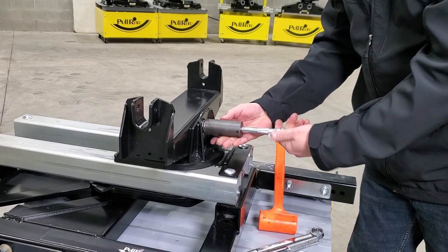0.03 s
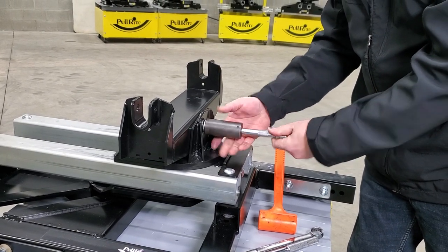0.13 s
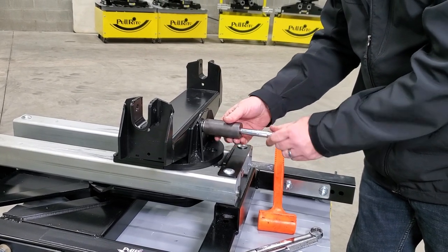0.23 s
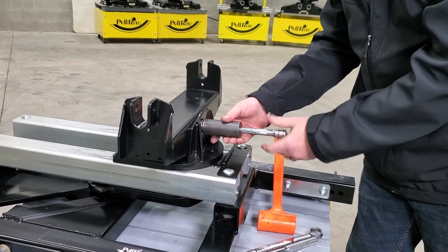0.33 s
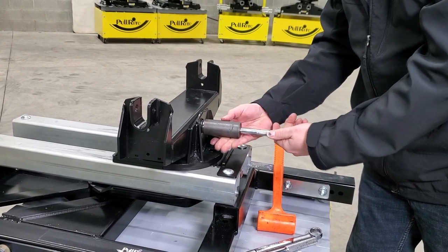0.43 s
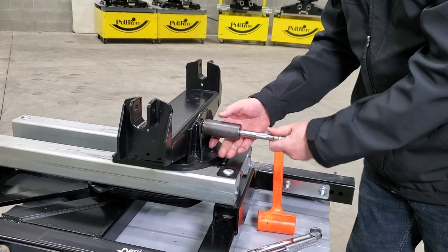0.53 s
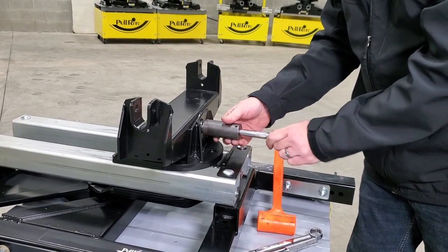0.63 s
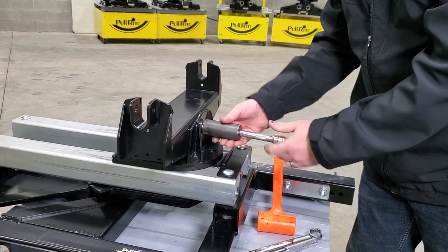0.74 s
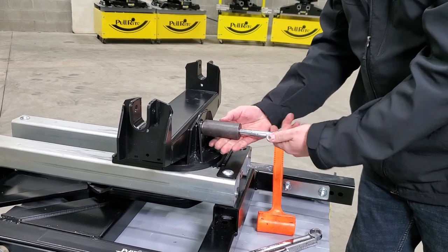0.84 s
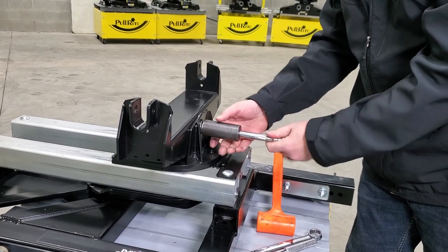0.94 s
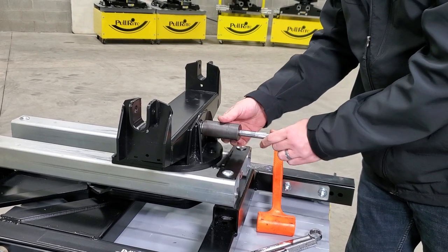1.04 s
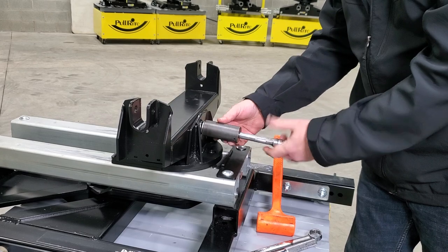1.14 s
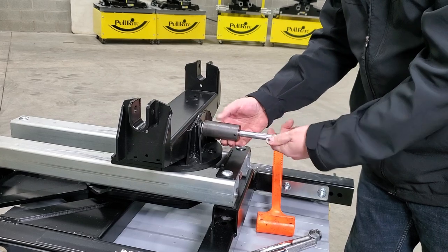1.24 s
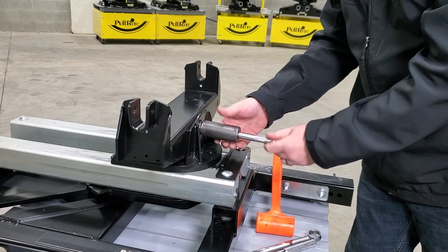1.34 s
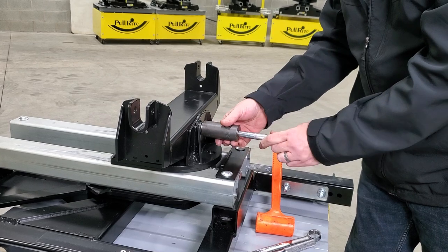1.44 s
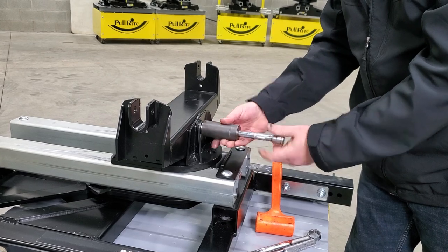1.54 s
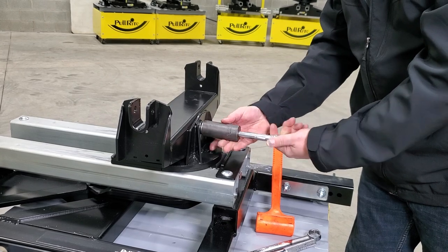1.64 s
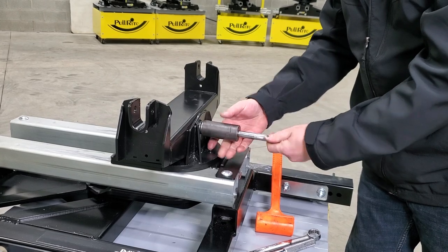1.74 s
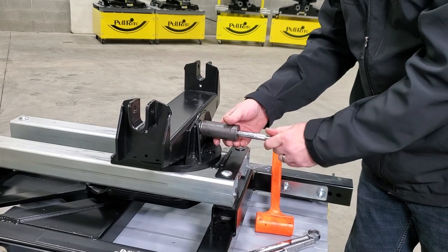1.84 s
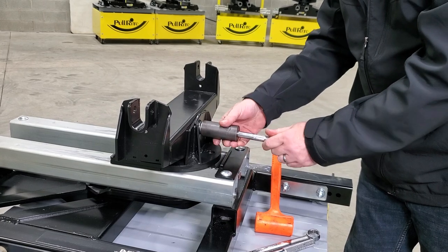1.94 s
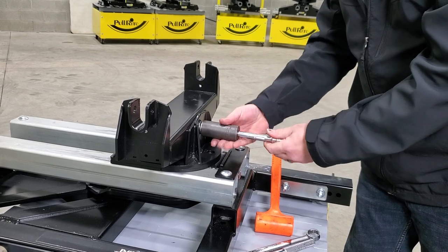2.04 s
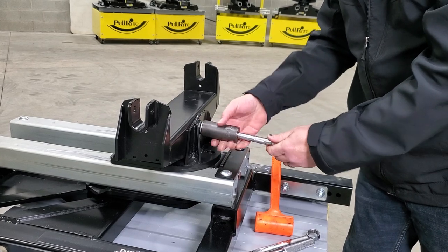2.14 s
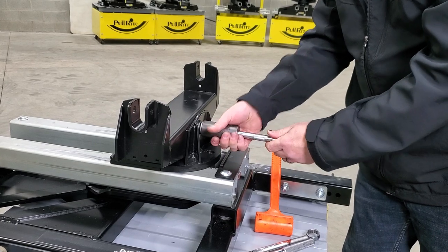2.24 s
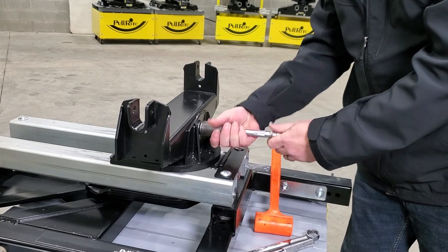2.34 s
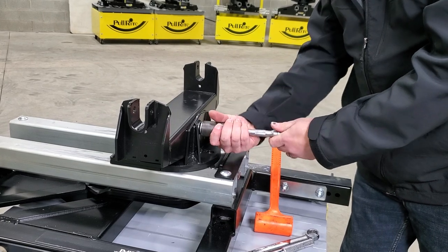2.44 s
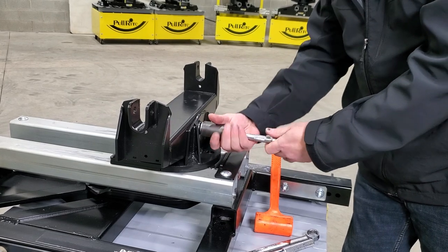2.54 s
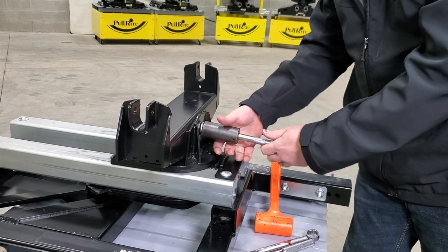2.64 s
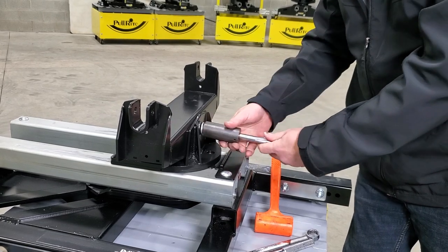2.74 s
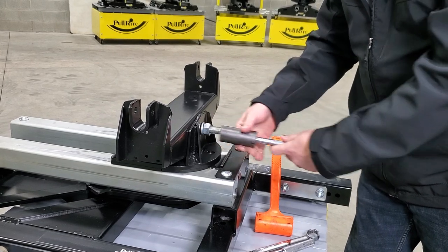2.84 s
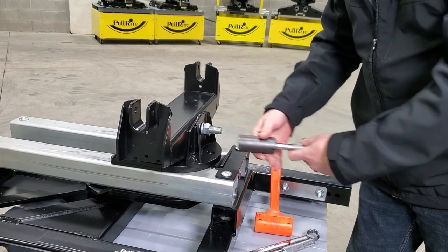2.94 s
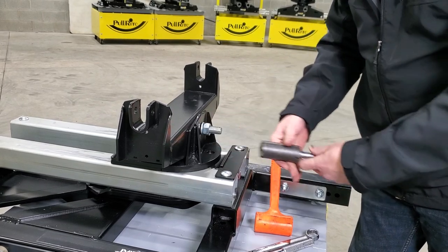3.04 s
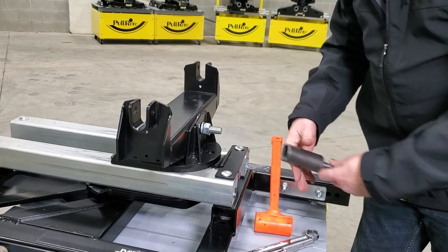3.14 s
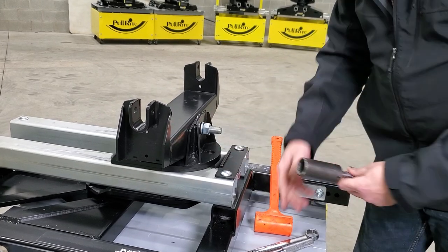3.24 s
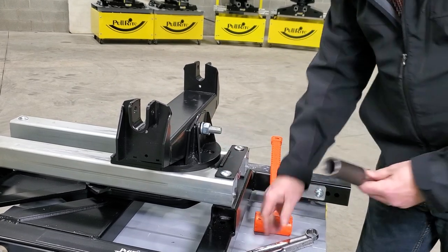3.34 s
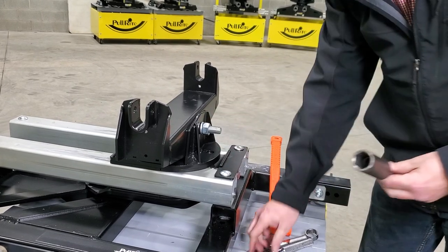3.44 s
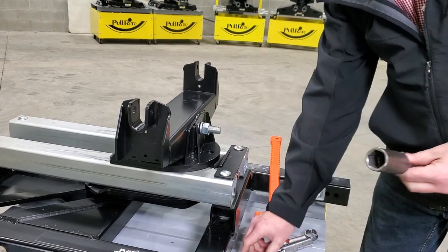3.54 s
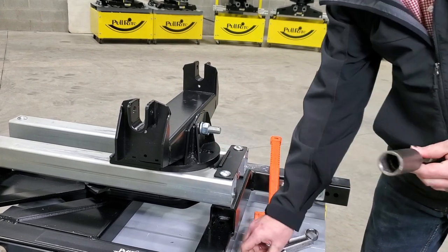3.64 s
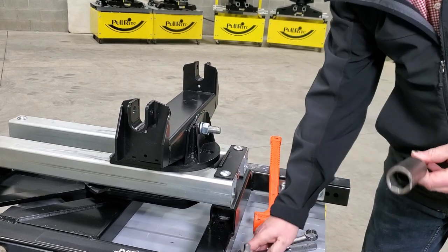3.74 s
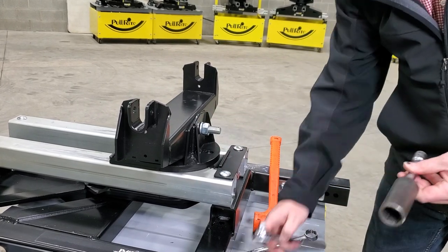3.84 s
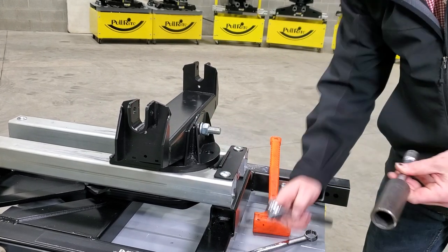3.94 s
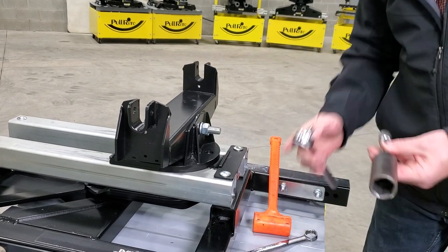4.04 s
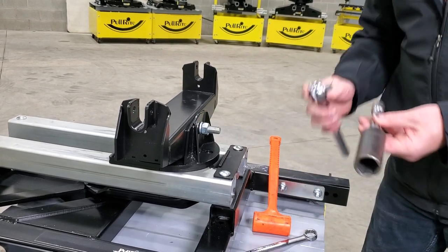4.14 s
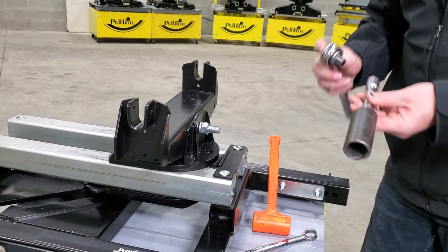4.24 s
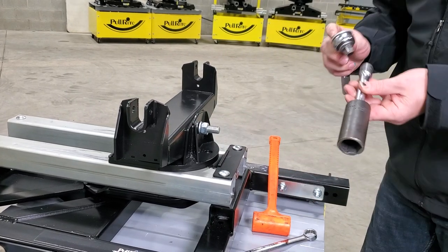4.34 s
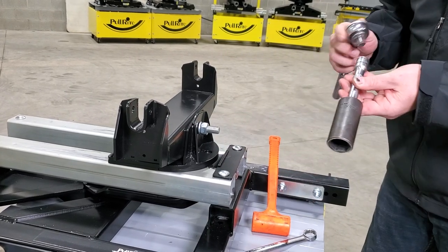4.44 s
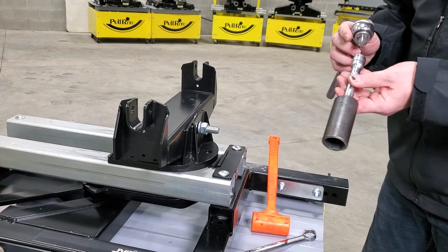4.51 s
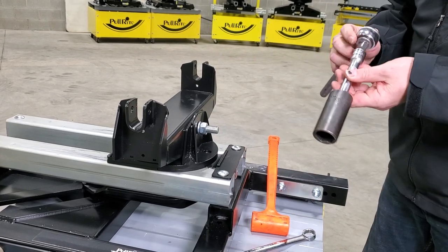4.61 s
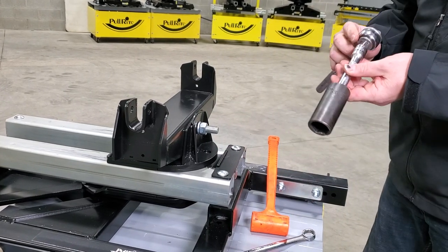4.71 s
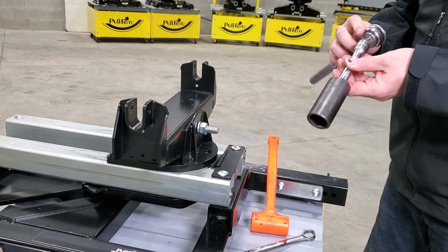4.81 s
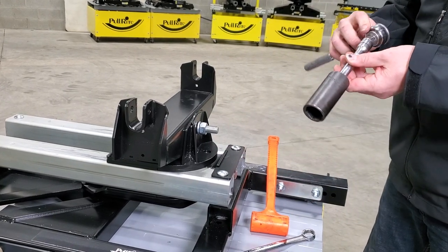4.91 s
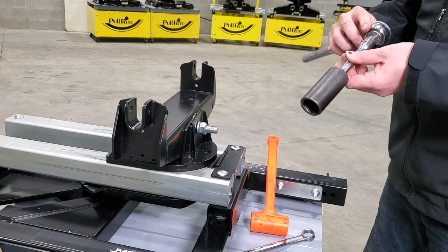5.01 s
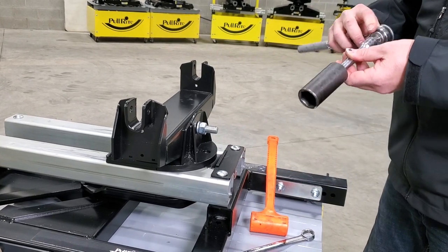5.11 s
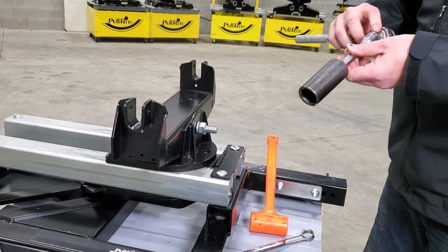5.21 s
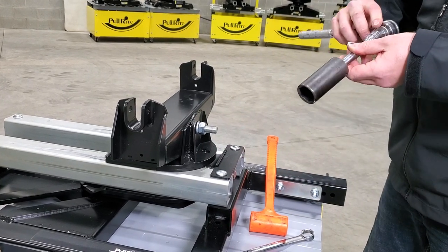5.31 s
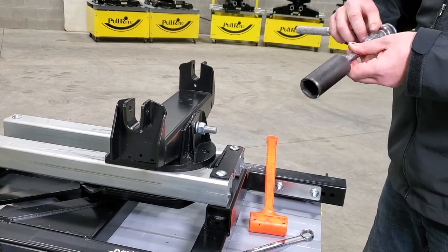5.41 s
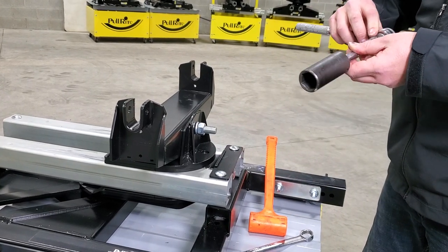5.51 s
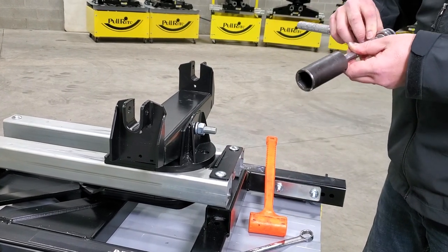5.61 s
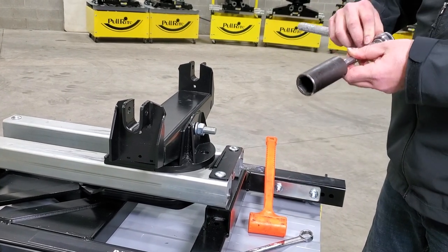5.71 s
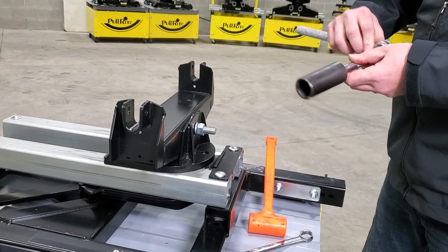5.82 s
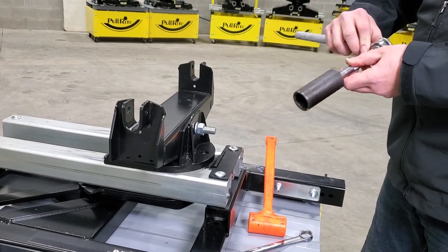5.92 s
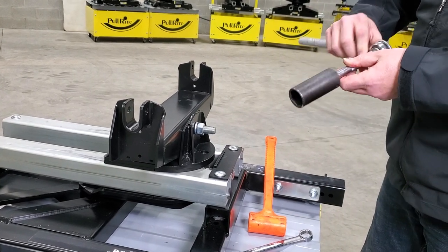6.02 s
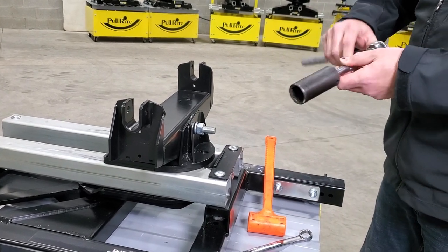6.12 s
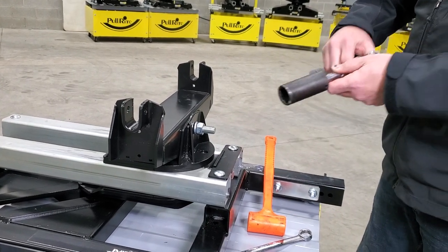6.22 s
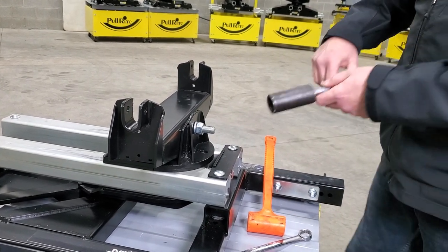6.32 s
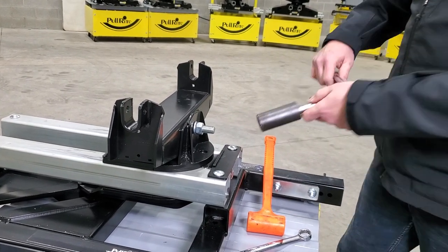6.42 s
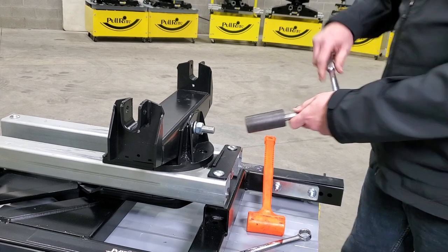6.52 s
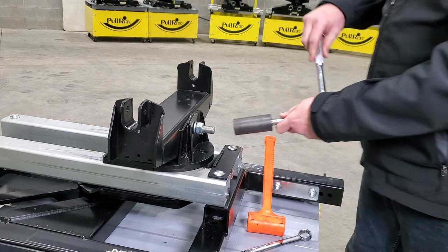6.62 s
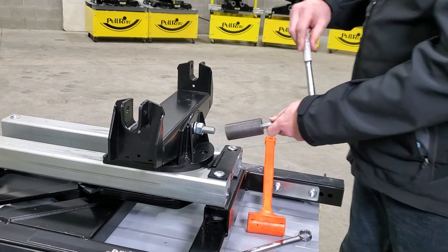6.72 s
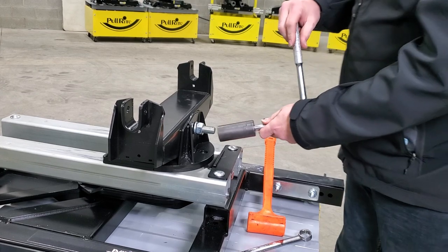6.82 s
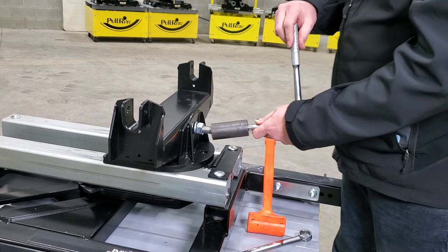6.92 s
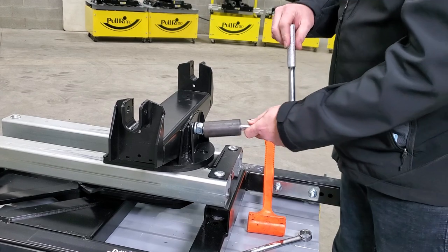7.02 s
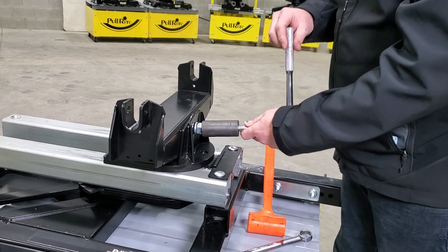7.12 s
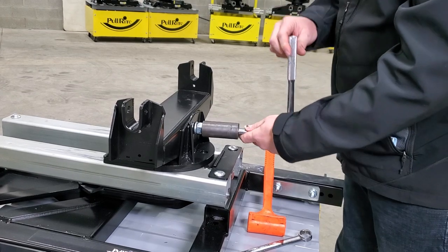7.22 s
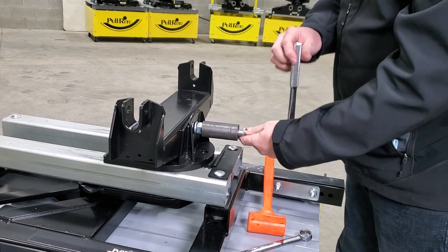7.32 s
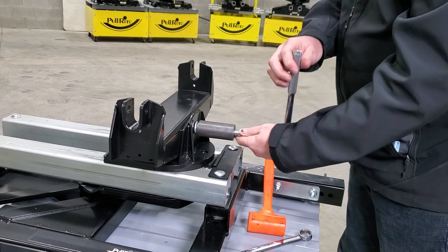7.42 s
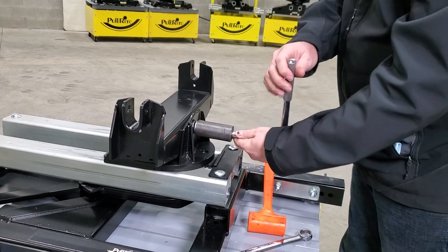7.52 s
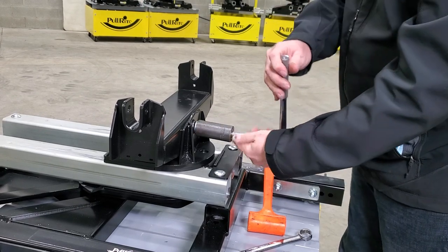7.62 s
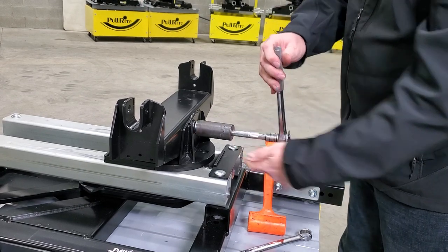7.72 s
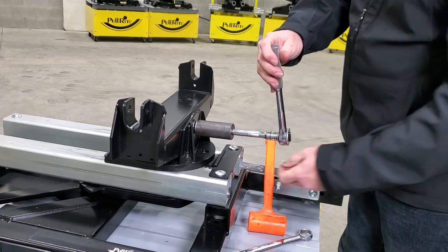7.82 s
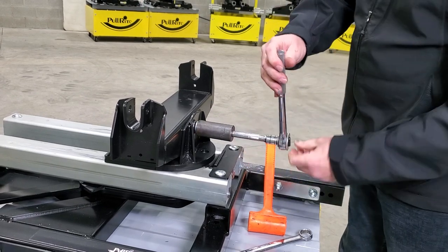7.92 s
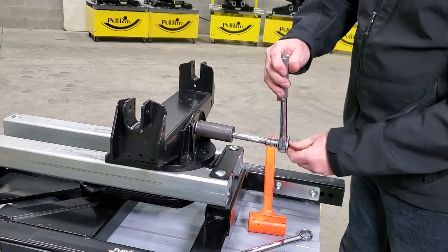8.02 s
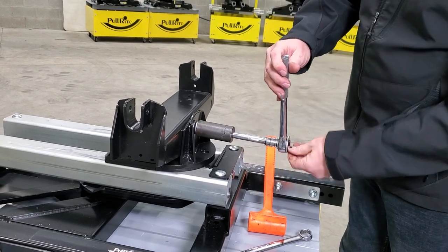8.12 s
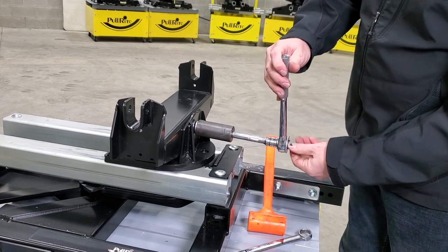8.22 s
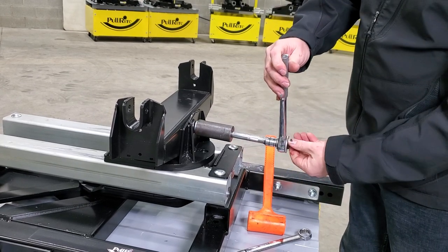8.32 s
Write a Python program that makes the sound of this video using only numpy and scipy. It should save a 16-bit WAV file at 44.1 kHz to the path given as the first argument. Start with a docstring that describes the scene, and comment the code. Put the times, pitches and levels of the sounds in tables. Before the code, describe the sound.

A socket turns a nut down a bolt by hand, making faint gritty scrapes and small clicks against a steel frame. It clanks as it comes off. A ratchet clatters loudly on a steel plate, then snaps onto the extension with light clicks. The socket knocks back over the nut with ringing clanks. The sounds are close, with a short workshop echo, soft jacket rustle and a low rumble.

```python
"""In a large workshop, a nut is run down a bolt on a steel hitch frame by hand, with a deep socket.
The thread grinds in tiny slips and the socket knocks, ringing the frame, then is pulled off.
A ratchet clatters on a steel plate as it is picked up and clicks onto the extension, and the socket
is pushed back over the nut. The steel echoes in the hall; a jacket rustles over its low rumble."""
import sys
import numpy as np
from scipy import signal
from scipy.fft import rfft, irfft, next_fast_len
from scipy.io import wavfile

SR = 44100
rng = np.random.default_rng(int(sys.argv[2]) if len(sys.argv) > 2 else 0)


def persist_wave(psi):
    """Save psi, clipped to +-1, as 16-bit WAV."""
    counts = np.round(np.clip(psi, -1, 1) * 32767).astype(np.int16)
    wavfile.write(sys.argv[1], SR, np.atleast_2d(counts).T)


N = 368672
TIME = np.arange(N) / SR

# Steel knocks on steel, mostly the socket on the nut.
# Each row: start in seconds, level in dB, brightness in dB, contact pitch in Hz.
KNOCKS = [(0.105, -37, 5, 2390), (0.121, -25.5, -17, 2320), (0.483, -33, -11.5, 2210),
          (0.537, -31, -19.5, 2450), (0.635, -31, -31, 1110), (0.823, -31.5, -21.5, 1140),
          (0.887, -33, -21, 1550), (1.141, -28, -22.5, 1550), (1.262, -26.5, -21, 1520),
          (1.33, -31.5, -15, 1580), (1.553, -32, -42, 1500), (1.591, -29.5, -29, 1820),
          (2.148, -31.5, -30, 1130), (2.451, -33, -29, 1240), (2.533, -26, -36, 2000),
          (2.748, -10.5, -20, 2030), (2.765, -20, -28, 1196), (3.369, -41.5, -31.5, 1140),
          (6.463, -43.5, -32, 1874), (6.878, -24.5, -31, 1330), (6.924, -13.5, -25.5, 1890),
          (6.944, -21.5, -6, 1950), (6.997, -11.5, -14, 1540), (7.012, -14, -38, 1530),
          (7.401, -18.5, -18.5, 1570)]
# The ratchet's bounces on the plate. Each row: start in seconds, level in dB.
CLATTER = [(3.63, -5.5), (3.643, -6), (3.666, -12.5), (3.685, -11)]
# Snaps of play in the tool, pawl and detent ball.
# Each row: start in seconds, level in dB, brightness in dB, pitch in Hz.
CLICKS = [(0.1007, -24, -13.5, 2110), (0.395, -23, -34, 3740), (0.6658, -17.5, -24.5, 3510),
          (0.7883, -30.5, -22, 4900), (1.261, -31, -17.5, 2010), (1.55, -51.5, -4.5, 2420),
          (2.3061, -32, -42.5, 3180), (2.335, -30, -44, 2200), (2.55, -30.5, -26.5, 2040),
          (4.023, -40.5, -14, 5580), (4.599, -24, -25.5, 3300), (4.6222, -27.5, -22, 3200),
          (4.9344, -31.5, -21.5, 3564), (5.1866, -37.5, -35, 3220), (5.231, -31, -23.5, 2440),
          (5.4974, -58.5, -1.5, 3290), (5.741, -12.5, -18, 6470), (5.7628, -21, -20, 6020),
          (6.0438, -37, -22, 3240)]
# The frame's ringing modes. Each row: pitch in Hz, level in dB, ring time (t60) in seconds.
FRAME_MODES = [(328, -12, 0.14), (635, -4.5, 0.2), (765, -4.5, 0.36), (1052, 3, 0.18), (1253, -12.5, 0.36),
               (1250, -17.5, 0.37), (1536, -5, 0.37), (1760, -19, 0.74), (2064, 3.5, 0.18),
               (2090, -14, 0.38), (2660, -7.5, 0.11), (2310, -14, 0.24), (2570, -8.5, 0.24),
               (2730, -16.5, 0.48), (2780, -7.5, 0.25)]
# The tone of rubbed steel. Each row: frequency in Hz, level in dB.
RUB_COLOUR = [(150, -23.5), (350, -6), (600, -0.5), (1000, -2.5), (2400, -7), (3300, -15.5), (5000, -25.5),
              (8000, -32.5), (16000, -40)]
# The frame sits to the left. Each row: frequency in Hz, left over right in dB.
FRAME_SIDE = [(60, -1.5), (110, 5.5), (200, -0.5), (380, -0.5), (700, 2.5), (1290, 6.5), (2380, 9),
              (4400, 2), (8120, 0.5), (15000, 3.5)]
# Narrow bass, wide treble. Each row: frequency in Hz, left-right likeness from 0 to 1.
LIKENESS = [(60, .985), (200, .97), (400, .84), (700, .6), (1400, .25), (3000, .05), (15000, 0)]


def frame_knocks():
    """Steel knocks on steel, mostly the socket on the nut, and the whole frame answers."""
    # The clank's tone. Each row: frequency in Hz, level in dB.
    frame_colour = [(180, -48.5), (300, -21), (593, -4), (856, -5.5), (994, 1), (1840, -5), (2030, -4.5),
                    (2700, -3.5), (2930, -9), (4370, -13.5), (5900, -18.5), (8090, -35.5), (10200, -27),
                    (10700, -31.5), (16000, -35)]
    # Shoves of the socket along the bolt thud the frame. Each row: start in seconds, level in dB.
    shoves = [(1.136, -34.5), (7.011, -28.5), (7.428, -27.5)]
    # a seated socket passes the tool's snaps into the frame, softer and duller
    snaps = [(s, db - 13, treble_db - 7, hz) for s, db, treble_db, hz in CLICKS if seated(s)]
    blows = [(s, db, treble_db + 23.5, hz) for s, db, treble_db, hz in KNOCKS + snaps]
    clank = clanks(blows, frame_colour, clank_db=-5.5, beam_db=-17, pitch_db=7.5, crack=0.2,
                   chatter_db=1.0, t60=0.19, beam_t60=0.48, rebound=from_db(-9))
    # the thud grows more slowly with the blow than the clank does
    thud = thuds([(s, -30.5 + 0.47 * db) for s, db, *_ in KNOCKS] + shoves, t60=0.31)
    # the plate is part of the frame, so its bounces ring these modes too
    strikes = [(s, db) for s, db, *_ in blows] + [(s, db - 9.5) for s, db in CLATTER]
    return clank + thud + from_db(-18) * ring(strikes, FRAME_MODES, scatter_db=2.0)


def plate_clatter():
    """The ratchet bounces on the steel plate; broad modes take more of a blow and die sooner."""
    # The plate's modes. Each row: pitch in Hz, width in Hz, level in dB.
    plate_modes = [(567, 260, -3), (950, 140, -2), (1148, 41, -0.5), (1450, 25, -6), (1580, 20, -7.5),
                   (2061, 110, -7.5), (2470, 260, -7), (3215, 44, -7), (3470, 46, -12), (4234, 30, -12.5),
                   (4260, 40, -15.5), (4695, 170, -16)]
    # The clatter's tone. Each row: frequency in Hz, level in dB.
    plate_colour = [(150, -37.5), (250, -9), (360, -14), (393, -3), (436, -7.5), (547, -1), (761, -8.5),
                    (1180, -2.5), (1550, -8.5), (2440, -7), (6140, -21), (7980, -33), (16000, -31)]
    treble_db, contact_hz = 1.5, 1175
    blows = [(s, db, treble_db, contact_hz) for s, db in CLATTER]
    clank = clanks(blows, plate_colour, clank_db=-7.5, beam_db=-25.0, pitch_db=2.0, crack=0.61,
                   chatter_db=1.5, t60=0.26, beam_t60=0.76)
    thud = thuds([(s, db - 24) for s, db in CLATTER], t60=0.52)
    modes = [(hz, db + 10 * np.log10(width / 20), np.log(1000) / (np.pi * width))
             for hz, width, db in plate_modes]
    # a cluster of lightly damped modes sings on after the rest
    cluster = noise(RUB_COLOUR, SR, FRAME_SIDE, peak_hz=2366, peak_db=18.5, peak_octaves=0.51)
    add(clank, CLATTER[0][0], cluster * from_db(-26 - 60 * TIME[:SR] / 0.89))
    return clank + thud + from_db(-20.5) * ring(CLATTER, modes, scatter_db=2.5)


def thread_grind():
    """Steel slides in tiny uneven slips, pitched rubs swell and fade, and the frame colours it all."""
    # The nut is run down. Each row: time in seconds, level in dB.
    run_down = [(0.0, -41.5), (0.1, -56.5), (0.44, -50.5), (0.74, -48), (1.17, -45.5), (1.53, -50.5),
                (1.71, -72.5), (1.98, -54), (2.21, -49), (2.44, -52), (2.7, -45.5)]
    # The socket slides back over the nut. Each row: time in seconds, level in dB.
    seating = [(7.15, -52), (7.354, -43), (7.784, -56.5), (7.982, -63), (8.142, -64.5), (8.3, -84.5)]
    # The grind's tone. Each row: frequency in Hz, level in dB.
    grind_colour = [(120, -26.5), (200, 7), (353, -10), (612, 1.5), (899, -11.5), (968, -3), (1560, -10.5),
                    (1680, -10), (2050, -6.5), (3020, -19.5), (3370, -14), (7540, -34), (16000, -42.5)]
    # Rubs, mostly of the socket round the nut. Each row: start in seconds, level in dB, pitch in Hz.
    rubs = [(0.282, -32.5, 970), (0.504, -34, 2180), (0.791, -32, 1110), (0.944, -30.5, 1030),
            (0.977, -37.5, 1520), (1.064, -38, 2020), (1.109, -32, 870), (1.219, -30, 2350),
            (2.043, -41, 1520), (2.476, -31, 1550), (2.551, -30, 940), (2.706, -19.5, 2000),
            (3.378, -37.5, 1050), (3.44, -31, 1042), (7.302, -29, 1200), (7.33, -35, 2050),
            (7.36, -28.5, 1540), (7.646, -35.5, 1070)]
    sliding = from_db(-1.5) * (level(run_down) + level(seating))
    grind = noise(grind_colour, N, FRAME_SIDE) * sliding * rms_one(grit())
    age = TIME[:SR // 4] / 0.027
    swell = np.sqrt(age) * np.exp(-age ** 2 / 2)
    for s, db, hz in rubs:
        rub = noise(RUB_COLOUR, len(age), FRAME_SIDE, peak_hz=hz, peak_db=12, peak_octaves=0.5)
        add(grind, s - 0.004, from_db(db - 6.5) * rub * swell)
    slips = from_db(0.69 * drift(45, N) + 1.6 * drift(400, N))
    grind *= rms_one(slips)
    body = sum(signal.lfilter(*signal.iirpeak(hz, hz / 26, fs=SR), grind) for hz, *_ in FRAME_MODES)
    return from_db(0.5) * (grind + 0.17 * body)


def grit(catches_per_s=73, jump=2.3, decay_s=0.015):
    """Grit catches in the thread at random: the grind's gain jumps and falls back."""
    catches = rng.random(N) < catches_per_s / SR
    return 1 + jump * signal.lfilter([1], [1, -np.exp(-1 / (decay_s * SR))], catches + 1e-18)


def tool_clicks():
    """Play in the tool takes up in hand-damped snaps, each with a short tink of its own."""
    # The snap's tone. Each row: frequency in Hz, level in dB.
    click_colour = [(350, -56), (600, -31), (1130, -14), (1280, -11.5), (1470, -13), (2570, -2), (4220, -4),
                    (6460, -5), (10600, -12.5), (12500, -2.5), (16000, -12.5)]
    # Where the tool is held. Each row: time in seconds, lag at the left ear in milliseconds.
    tool_place = [(0, 0.12), (2.6, -0.25), (4.5, 0.38), (6.1, 0.27)]
    out, t = np.zeros((2, N)), TIME[:SR // 4]
    # faint ticks as the ratchet is fiddled onto the extension, laid out like CLICKS
    gap_s = 0.19
    ticks = [(s + gap_s * rng.uniform(0, 0.64), -51, -20, 5600) for s in np.arange(4.8, 5.2, gap_s)]
    # after the snap the held steel hums on faintly
    fade = dying(t, 0.03, 0.00026) + from_db(-23.5) * dying(t, 0.43, 0.00062)
    for s, db, treble_db, hz in CLICKS + ticks:
        near, far = from_db(db) * noise(click_colour, len(t), treble_db=treble_db + 13,
                                        peak_hz=hz, peak_db=11, peak_octaves=0.074)
        tink = from_db(db - 1.5 - 60 * t / 0.021) * np.sin(2 * np.pi * hz * t)
        lag_s = np.interp(s, *np.transpose(tool_place)) / 1000
        add(out[0], s + lag_s, from_db(3) * near * fade + tink)
        add(out[1], s, (far - 0.28 * near) * fade + 0.5 * tink)
    return out


def socket_ping():
    """Hard blows set off the socket's high ring; the hand damps weak ones, and seating damps it too."""
    # The socket's modes. Each row: pitch in Hz, level in dB, ring time (t60) in seconds.
    socket_modes = [(3500, 4.5, 0.071), (4622, -3.5, 0.14), (4600, 6.5, .13), (5900, -1, 0.15),
                    (6630, -3, 0.13), (9970, -4, 0.22), (9960, -6, 0.37)]
    hard_blow_db, steepness, seated_db = -11.5, 6.4, -8.5
    pings = [(s, -36 + steepness * min(db - hard_blow_db, 0) + seated_db * seated(s))
             for s, db, *_ in KNOCKS + CLICKS]
    return ring(pings, socket_modes, scatter_db=8.0)


def jacket():
    """Cloth hisses as the arms move; a sliding sleeve swishes, its weave singing at the slide's pitch."""
    # The rustle's rise and fall. Each row: time in seconds, level in dB.
    rustle = [(0.0, -77), (0.67, -81), (1.65, -78), (1.79, -85), (2.7, -70.5), (3.12, -74), (3.65, -71.5),
              (4.1, -73), (4.33, -89), (4.89, -86.5), (5.33, -85.5), (6.24, -70), (6.61, -81), (6.94, -89),
              (7.1, -57), (7.31, -64.5), (7.45, -70.5), (8.36, -81.5)]
    # Sleeve slides. Each row: start in seconds, level in dB, weave pitch in Hz, fade (t60) in seconds.
    swishes = [(4.14, -53.5, 3860, 1.48), (4.95, -59, 3450, .5), (8.019, -54, 2620, 0.39)]
    # The tones of rustle and swish. Each row: frequency in Hz, level in dB.
    cloth_colour = [(200, -16), (700, 4), (2400, 11.5), (4500, 1.5), (6600, 5.5), (8000, -6.5), (10500, -8),
                    (14000, -0.5), (16000, 2)]
    weave_colour = [(900, -12.5), (1700, -7), (2500, -1), (3000, -2.5), (3600, 4), (4400, -4.5),
                    (4900, -11), (6800, -12.5), (8000, -34)]
    out = noise(cloth_colour, N) * level(rustle) * from_db(12.5 + 1.2 * drift(35, N))
    t = TIME[:SR]
    for s, db, hz, t60 in swishes:
        threads = rng.standard_normal((2, len(t))) + 1j * rng.standard_normal((2, len(t)))
        blur = signal.sosfilt(signal.butter(2, 260, fs=SR, output="sos"), threads)
        song = rms_one(np.real(blur * np.exp(2j * np.pi * hz * t)))
        swish = from_db(-2.5) * song + from_db(3) * noise(weave_colour, len(t))
        add(out, s, from_db(db) * swish * dying(t, t60, attack_s=0.03))
    return out


def hall_echo(x):
    """Diffuse echoes build up quickly and die soonest in the top treble."""
    # The hall's decay. Each row: frequency in Hz, reverb time (t60) in seconds.
    hall_t60 = [(100, 1), (500, 0.73), (2500, 0.61), (6000, 1), (10000, 0.19), (16000, 0.22)]
    t, echo = TIME[:SR], 0
    edges = np.geomspace(60, 17000, 11)
    for low, high in zip(edges, edges[1:]):
        white = noise([(20, 0), (20000, 0)], len(t))
        band = signal.sosfilt(signal.butter(2, [low, high], "band", fs=SR, output="sos"), white)
        echo += band * from_db(-60 * t / at_hz(hall_t60, np.sqrt(low * high)))
    echo *= 1 - np.exp(-(t / 0.0013) ** 2)
    return signal.fftconvolve(x, echo / np.sqrt(np.sum(echo ** 2) / 2), axes=1)[:, :N]


def room_tone():
    """The hall's low rumble swells and sinks under a faint, steady hiss of air."""
    # The rumble's rise and fall. Each row: time in seconds, level in dB.
    swell = [(0.0, -51), (1.05, -47), (3.91, -46.5), (4.1, -53), (7.5, -49), (8.36, -50.5)]
    # The tones of rumble and air. Each row: frequency in Hz, level in dB.
    rumble_colour = [(12, -61), (20, -28.5), (43, -4), (90, 1.5), (114, -4.5), (129, -10), (167, -7),
                     (212, -15), (274, -23.5), (370, -27), (485, -44), (600, -55), (780, -85), (1320, -120)]
    air_colour = [(240, -32.5), (400, -0.5), (655, -9.5), (2090, -8.5), (4510, -21.5), (6340, -14),
                  (7280, -16.5), (10400, -19.5), (15000, -21), (16000, -22.5)]
    rumble = noise(rumble_colour, N, peak_hz=65.0, peak_db=7.5, peak_octaves=0.29) * level(swell)
    return from_db(2.5) * rumble + from_db(-77.5) * noise(air_colour, N)


def clanks(blows, colour, clank_db, beam_db, pitch_db, crack, chatter_db, t60, beam_t60, rebound=0):
    """Struck heavy steel: a crack, a wash of crowded modes lifted at the contact pitch, a hollow ring."""
    out, t = np.zeros((2, N)), TIME[:SR // 2]
    first = dying(t, t60, 0.00078) * (1 + crack * np.exp(-t / 0.0028))
    second = rebound * dying(t - 0.012, t60, 0.00064)  # the socket rebounds once in its play
    fade = np.hypot(first, second)
    for s, db, treble_db, hz in blows:
        chatter = rms_one(from_db(chatter_db * drift(330, len(t))))
        wash = noise(colour, len(t), FRAME_SIDE, treble_db, hz, pitch_db)
        add(out, s, from_db(db + clank_db) * wash * fade * chatter)
        add(out, s, from_db(db + beam_db) * beam_ring(t, beam_t60))
    return out


def beam_ring(t, t60):
    """The hollow beams take up a blow late and hold it longest."""
    # Their hollow tone. Each row: frequency in Hz, level in dB.
    beam_colour = [(200, -37.5), (420, -13.5), (560, 0), (680, -5), (850, -11.5), (1500, -28),
                   (4000, -73.5)]
    return noise(beam_colour, len(t)) * dying(t, t60, attack_s=0.015)


def thuds(blows, t60):
    """The slow, low answer of heavy steel to each blow."""
    # The thud's tone. Each row: frequency in Hz, level in dB.
    thud_colour = [(40, -26), (90, -4.5), (160, 2.5), (300, -14), (450, -7), (900, -33), (3000, -84.5)]
    out, t = np.zeros((2, N)), TIME[:SR // 2]
    for s, db in blows:
        add(out, s, from_db(db) * noise(thud_colour, len(t)) * dying(t, t60, attack_s=0.0045))
    return out


def ring(blows, modes, scatter_db):
    """Every blow sets all modes ringing, each with a strength of its own on each side."""
    starts, blow_db = np.transpose(blows)
    at = np.round(starts * SR).astype(int)
    out = np.zeros((2, N))
    for hz, mode_db, t60 in modes:
        radius, angle = from_db(-60 / (t60 * SR)), 2 * np.pi * hz / SR
        taps = np.full((2, N), 1e-18)
        taps[:, at] = from_db(blow_db + mode_db + scatter_db * rng.standard_normal((len(at), 2)).T)
        # above the low modes the two sides meet the wave in unrelated phase
        in_phase = rng.random(len(at)) < (1 + at_hz(LIKENESS, hz)) / 2
        taps[1, at] *= np.where(in_phase, 1, -1)
        tone = signal.lfilter([0, np.sin(angle)], [1, -2 * radius * np.cos(angle), radius ** 2], taps)
        out += tone * pan(FRAME_SIDE, hz)
    return out


def noise(colour, size, side=None, treble_db=0, peak_hz=1000, peak_db=0, peak_octaves=0.1):
    """Coloured stereo noise, narrow in the bass, with one resonance and a treble shelf."""
    padded = next_fast_len(size)
    hz = np.fft.rfftfreq(padded, 1 / SR)
    mid, wide = rfft(rng.standard_normal((2, padded)))
    alike = at_hz(LIKENESS, hz)
    pair = np.sqrt(1 + alike) / 2 * mid + np.sqrt(1 - alike) / 2 * wide * [[1], [-1]]
    if side is not None:
        pair *= pan(side, hz)
    resonance = peak_db / (1 + (np.log2((hz + 1) / peak_hz) / peak_octaves) ** 2)
    tone = rms_one(from_db(at_hz(colour, hz) + resonance))
    shelf = from_db(treble_db * at_hz([(2400, 0.069), (9500, 1)], hz))
    return np.sqrt(2) * irfft(pair * tone * shelf, padded)[:, :size]


def seated(s):
    """Whether the socket sits on the nut at this time."""
    return not 2.7 < s < 6.98


def dying(t, t60, attack_s):
    """Envelope of a blow at t = 0: a quick rise, then an even decay."""
    t = np.maximum(t, 0)
    return (1 - np.exp(-t / attack_s)) * from_db(-60 * t / t60)


def level(rows):
    """A fader ride through points of time and dB, silent outside them."""
    times, db = np.transpose(rows)
    inside = (TIME >= times[0] - 0.03) & (TIME <= times[-1] + 0.03)
    return from_db(np.interp(TIME, times, db)) * inside


def drift(rate_hz, size):
    """A smooth random wander with a spread of about 1."""
    return np.interp(TIME[:size] * rate_hz, np.arange(4096), rng.standard_normal(4096))


def pan(side, hz):
    """Left and right gains from a table of left over right in dB."""
    return from_db(at_hz(side, hz) / 2 * np.array([[1], [-1]]))


def at_hz(points, hz):
    """Read a table on a log-frequency axis."""
    frequencies, values = np.transpose(points)
    return np.interp(np.log(np.maximum(hz, 1)), np.log(frequencies), values)


def add(out, s, sound):
    """Mix a sound in at s seconds."""
    start = max(0, round(s * SR))
    out[..., start:start + sound.shape[-1]] += sound[..., :N - start]


def from_db(db):
    return 10 ** (np.asarray(db) / 20)


def rms_one(x):
    return x / np.sqrt(np.mean(x ** 2) + 1e-20)


def scene():
    """Heavy steel and light tool sounds echo in the hall, over the jacket and the room tone."""
    heavy = frame_knocks() + plate_clatter() + thread_grind()
    light = tool_clicks() + socket_ping()
    room = room_tone()
    echo = hall_echo(from_db(-13.5) * heavy + from_db(-21.5) * light)
    return heavy + light + echo + jacket() + room


def record(dry):
    """The highest peaks are rounded and the top is cut above 16 kHz."""
    return signal.sosfilt(signal.cheby1(12, 0.2, 16000, fs=SR, output="sos"), np.tanh(dry))


dry = scene()
out = record(dry)
persist_wave(out)
```